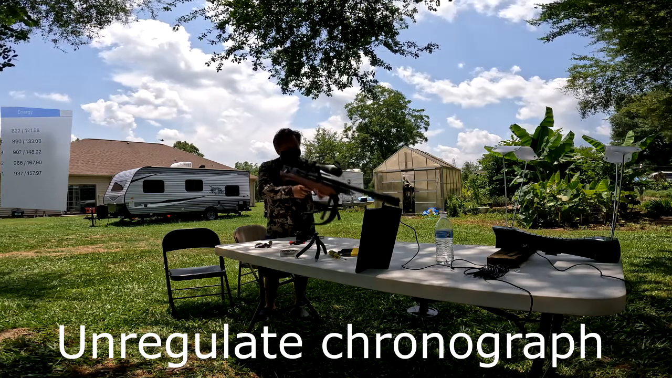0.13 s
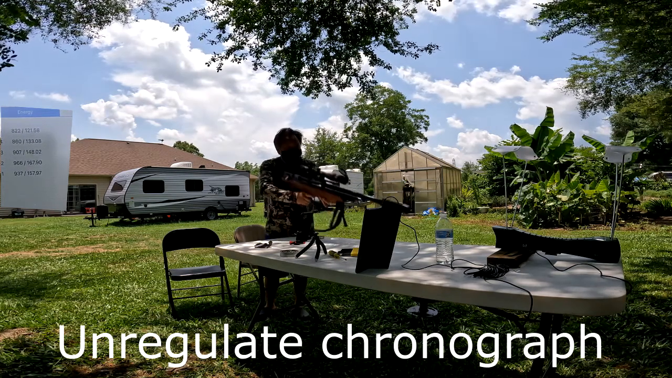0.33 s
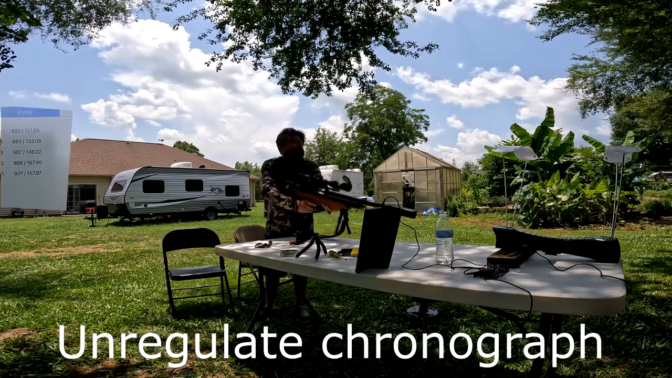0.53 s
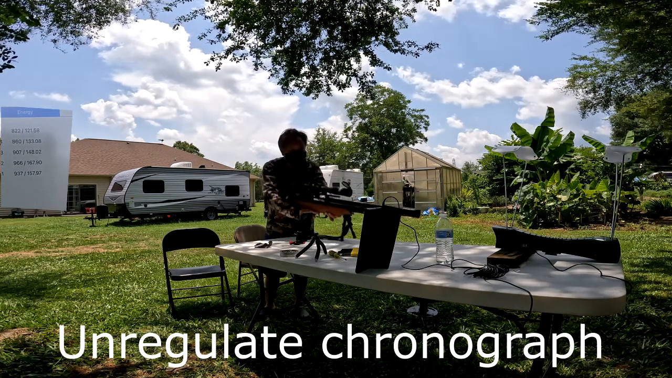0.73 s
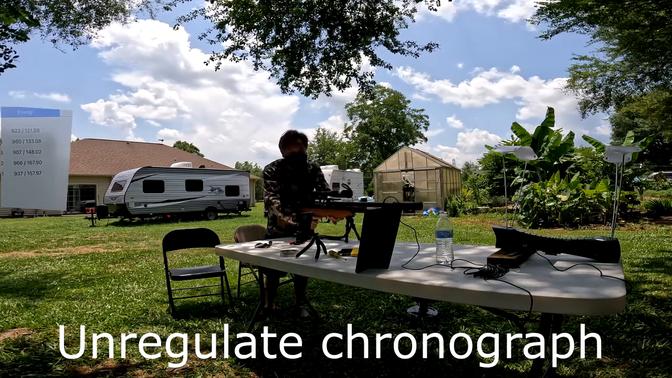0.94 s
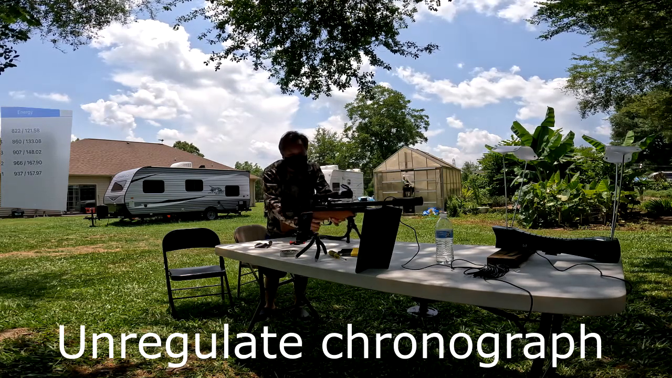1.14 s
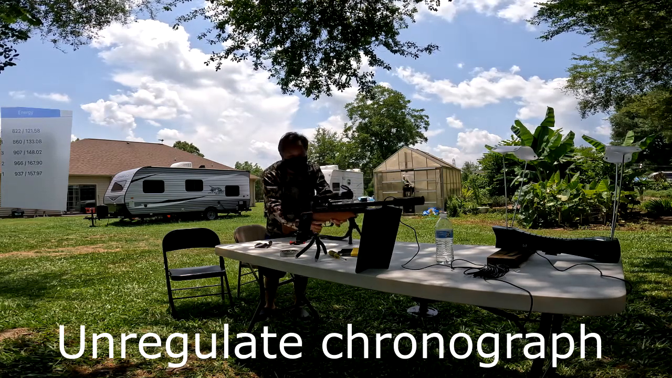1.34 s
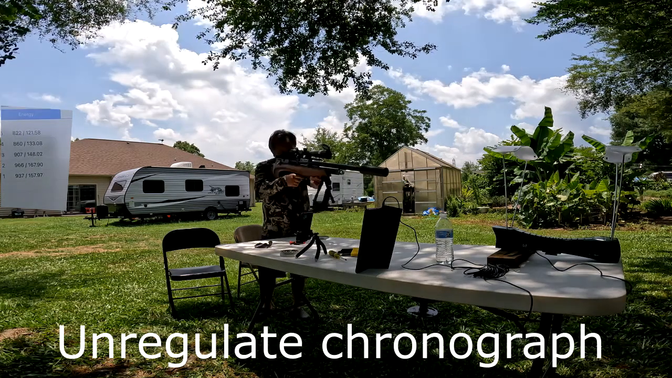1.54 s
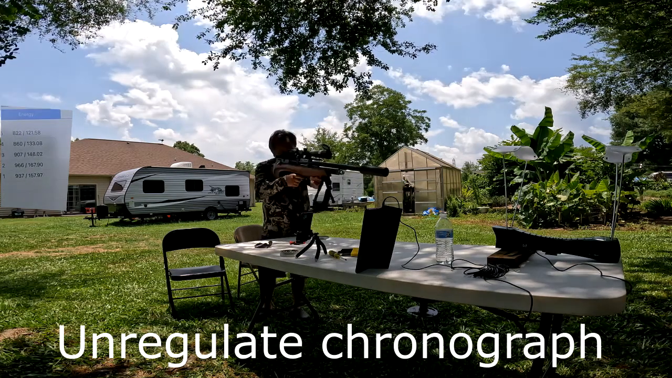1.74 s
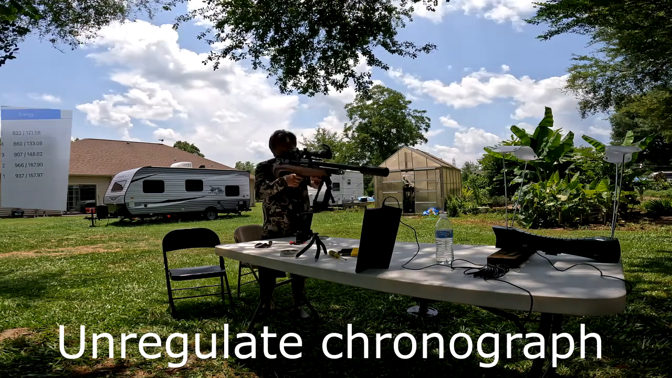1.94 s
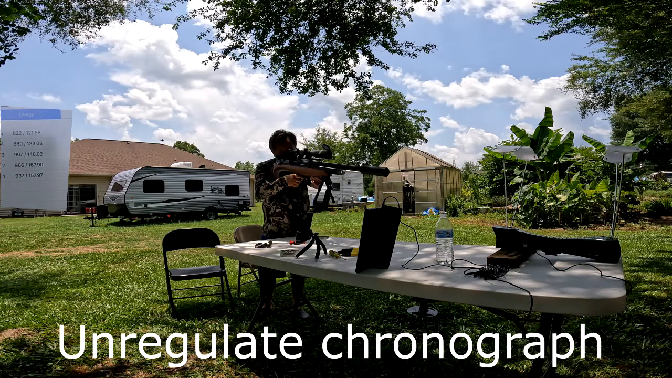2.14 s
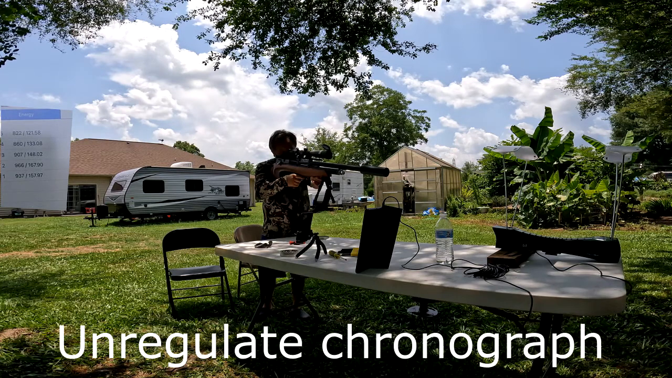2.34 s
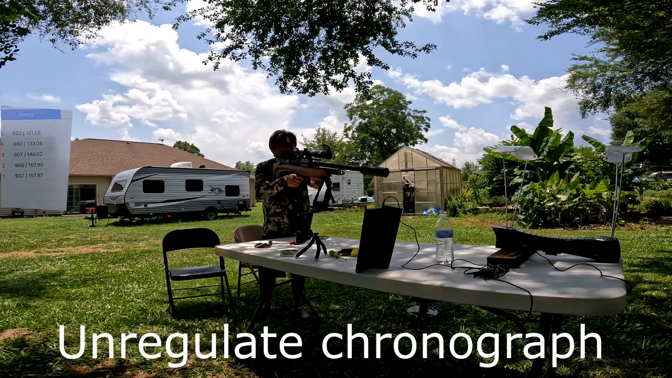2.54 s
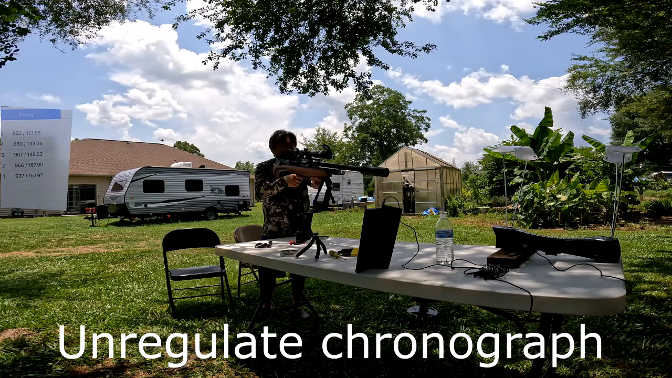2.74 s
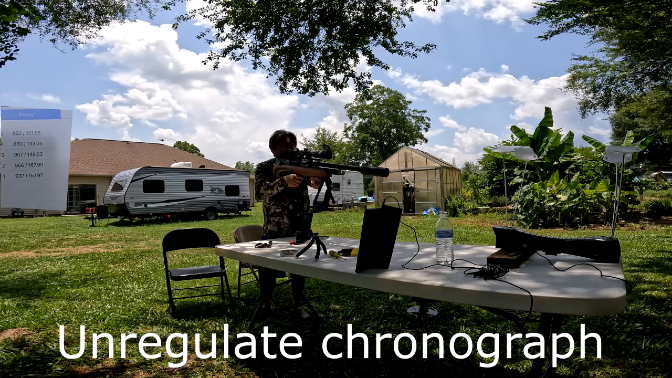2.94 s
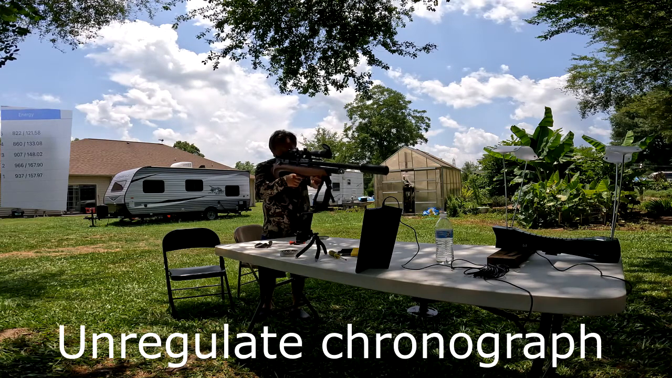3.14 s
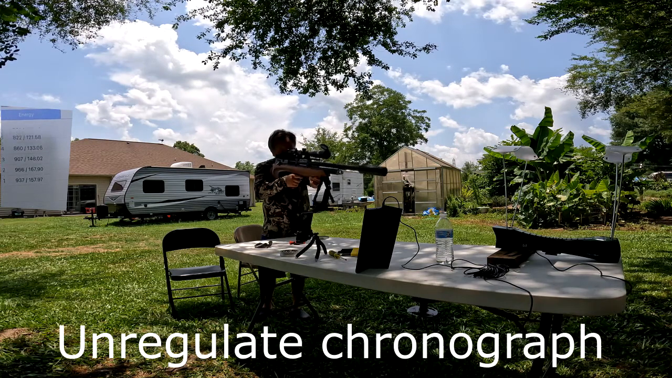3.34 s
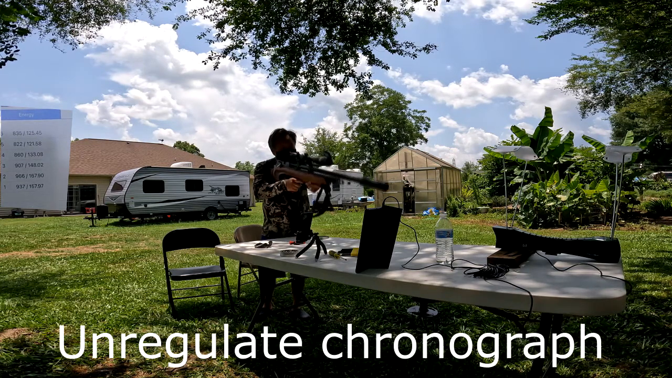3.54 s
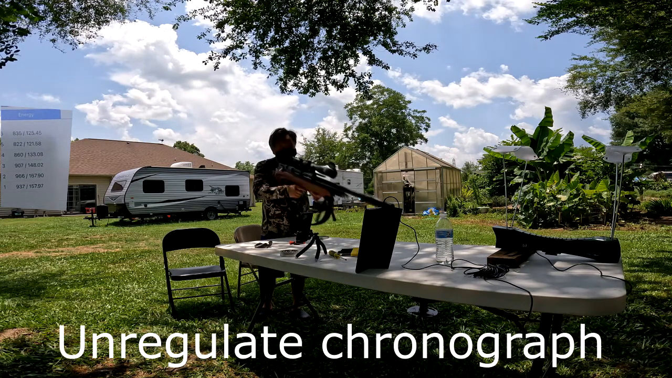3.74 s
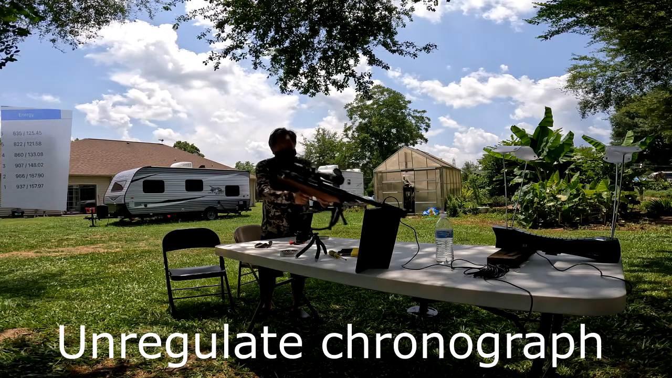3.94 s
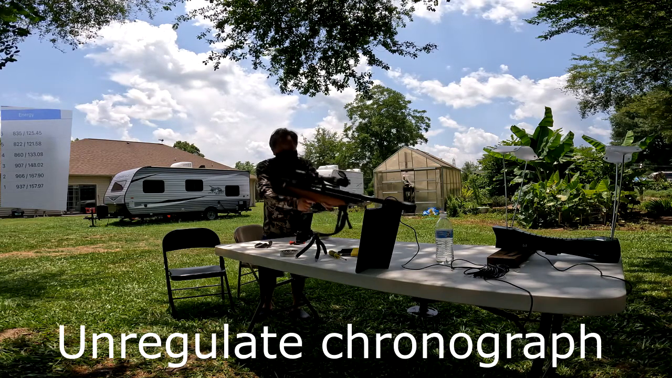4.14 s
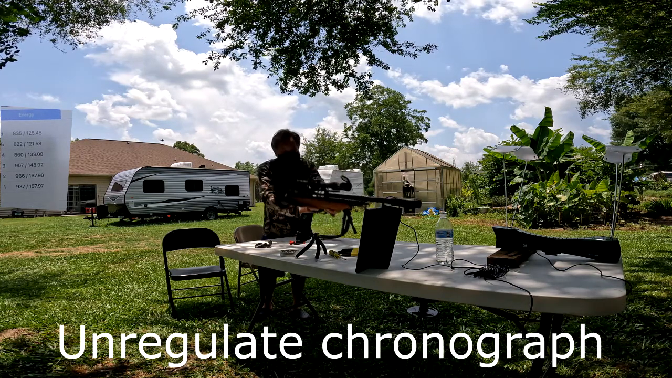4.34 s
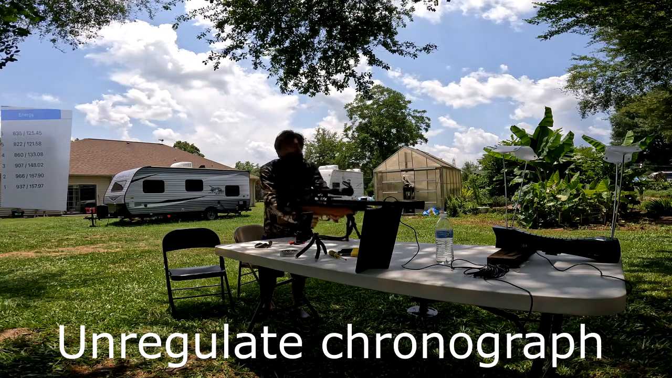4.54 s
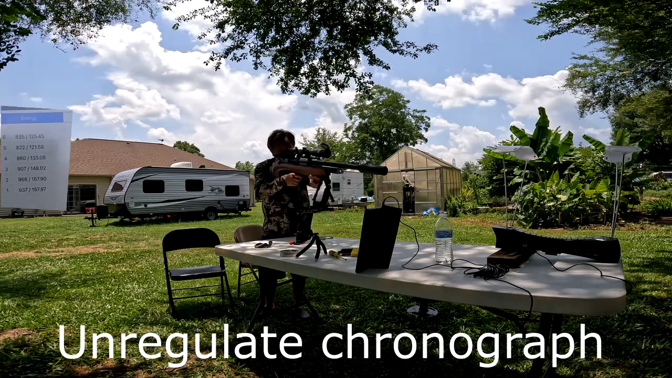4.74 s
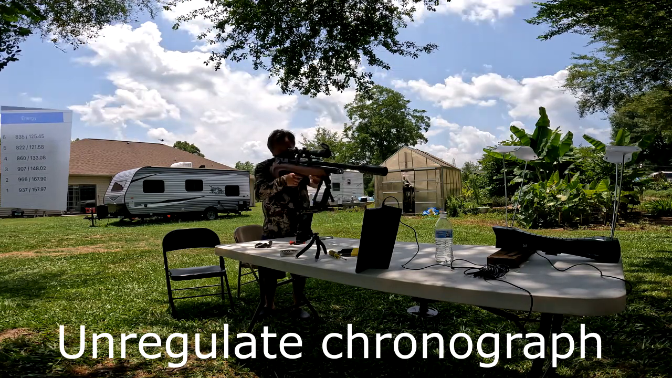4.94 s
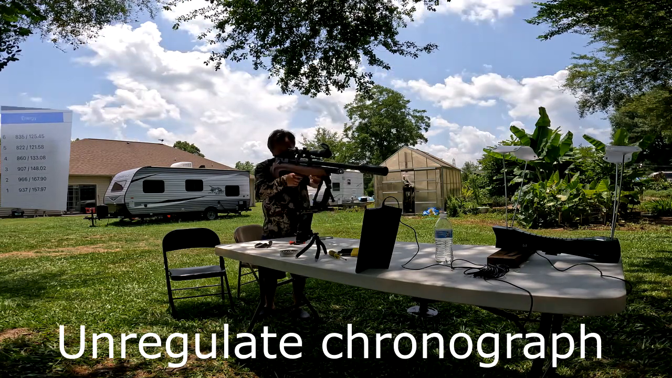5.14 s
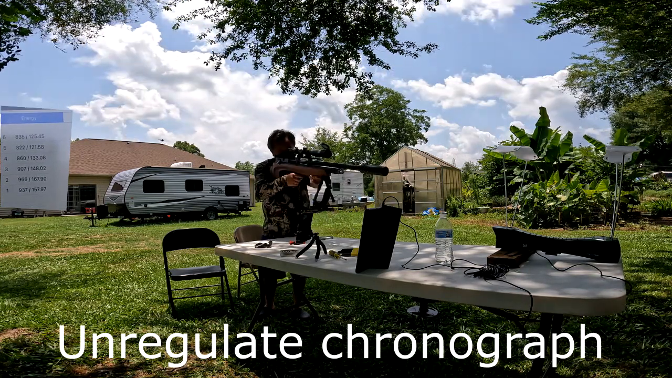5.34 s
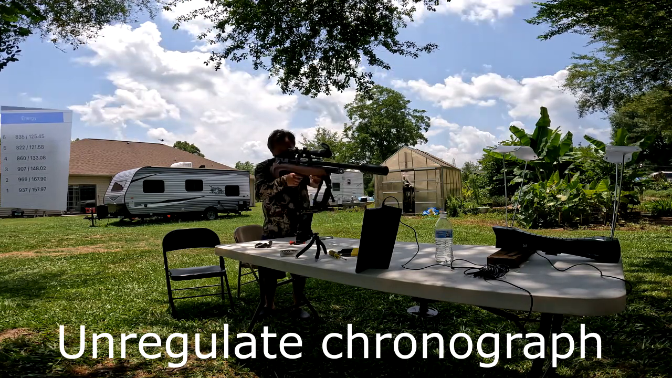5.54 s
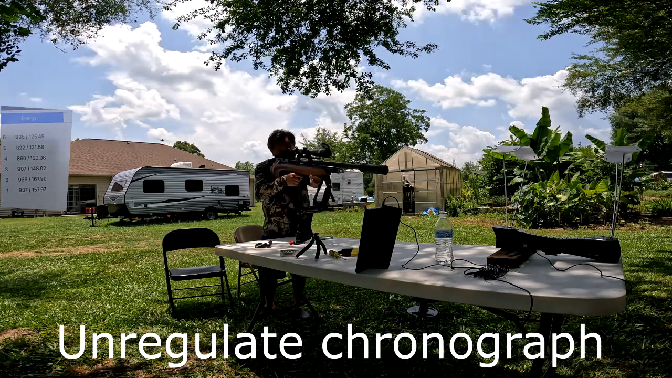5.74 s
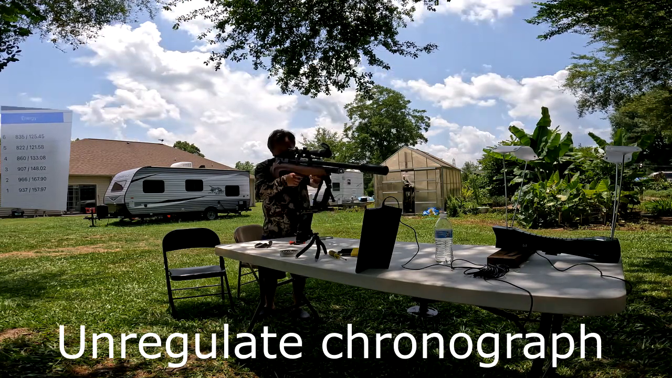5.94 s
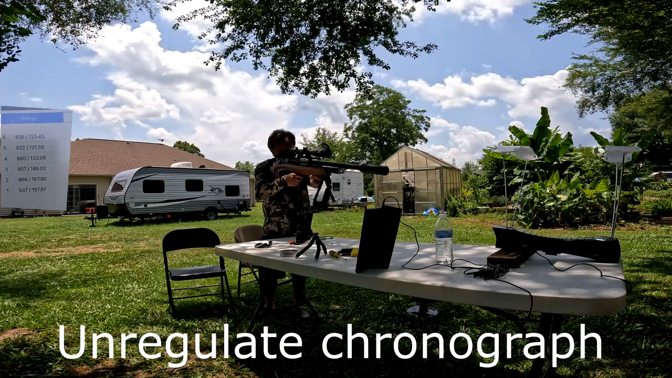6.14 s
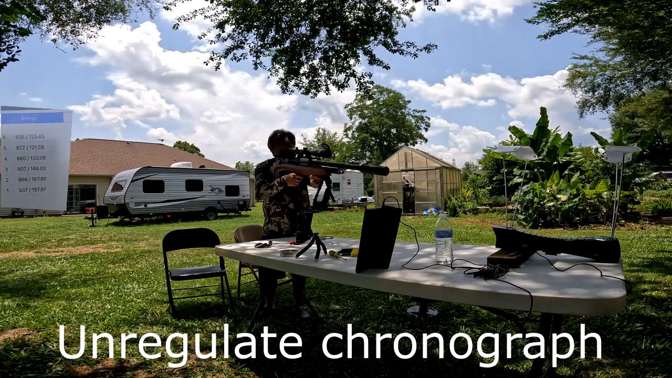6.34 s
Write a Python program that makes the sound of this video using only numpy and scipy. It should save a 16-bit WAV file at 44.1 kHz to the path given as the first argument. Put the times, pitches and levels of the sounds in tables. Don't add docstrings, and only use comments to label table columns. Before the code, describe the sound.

Stereo outdoor sound, close to an air rifle: two metallic lever clacks over engine drone and breeze, a gust bumping the microphone, a momentary dropout, then a low passing vehicle. One hard, bright air crack clips, with a target smack right behind it and a short scattered echo. The background dips and recovers, with faint squeaks and knocks. After a second dropout only generator, leaves, faint insect and birds remain, with a vehicle fading away.

```python
import sys
import numpy as np
from scipy import signal
from scipy.fft import rfft, irfft, next_fast_len
from scipy.io import wavfile
from scipy.ndimage import uniform_filter1d

SR = 44100
rng = np.random.default_rng(int(sys.argv[2]) if len(sys.argv) > 2 else 0)


def attenuation_scalar(level_db):
    decades = np.asarray(level_db, float) / 20
    return 10 ** decades


def master(y):
    cut = np.clip(np.atleast_2d(y).T, -1, 1)
    pcm = np.round(cut * 32767)
    wavfile.write(sys.argv[1], SR, pcm.astype(np.int16))


N = 281799
SHOT_S, EARLIER_S = 3.214, -0.42


def evened(x):
    return x / np.sqrt(np.mean(x ** 2) + 1e-20)


def read(points, hz):
    f, value = np.transpose(points)
    return np.interp(np.log(hz + 1), np.log(f + 1), value)


def curve(rows, outside=None):
    s, *columns = np.transpose(rows)
    t = np.arange(N) / SR
    return [np.interp(t, s, column, outside, outside) for column in columns]


def add(mix, s, sound, lean_db):
    part = mix[:, round(s * SR):][:, :len(sound)]
    part += sound[:part.shape[1]] * attenuation_scalar([[lean_db / 2], [-lean_db / 2]])


def resonate(x, hz, width):
    turn = np.exp(2j * np.pi * np.cumsum(hz * np.ones(len(x))) / SR)
    r = np.exp(-np.pi * width / SR)
    return 2 * (turn * signal.lfilter([1 - r], [1, -r], x / turn)).real


def resonate_twice(x, hz, width):
    return resonate(resonate(x, hz, width), hz, width)


def passband(x, hz, spread):
    f = np.fft.rfftfreq(x.shape[-1], 1 / SR)
    bell = np.exp(-(np.log((f + 1) / hz) / spread) ** 2)
    return irfft(rfft(x) * bell, x.shape[-1])


def wander(per_s):
    steps = rng.standard_normal(500)
    return np.interp(np.arange(N) / SR * per_s, np.arange(len(steps)), steps)


def tone(hz, db, unsteady_db):
    phase = 2 * np.pi * (np.cumsum(hz * np.ones(N)) / SR + rng.random())
    return np.sqrt(2) * attenuation_scalar(db + unsteady_db * wander(per_s=9.)) * np.sin(phase)


def since_shot(t, shot_s):
    return t - np.where(t > shot_s, shot_s, EARLIER_S)


# (frequency [Hz], level [dB per Hz])
YARD = [(20, -7.5), (70, -3.5), (150, -2.5), (300, -16), (400, -22), (560, -19), (800, -25.5), (1300, -22),
        (2000, -30), (4000, -38), (7000, -44), (8500, -53.5), (13000, -59), (14000, -72)]
# (time [s], level [dB])
BREEZE = [(0, 1.5), (.5, -.5), (1.2, 1.5), (2.3, 1), (3.8, 0.5), (6.39, 1)]
# (frequency [Hz], likeness [0-1])
SAME = [(60, 1.0), (180, 1.0), (550, 0.91), (1650, 0.75), (4970, 0.62), (15000, 0.5)]
# (frequency [Hz], left minus right [dB])
LEAN = [(60, 1.5), (180, -0.5), (550, 0), (1650, 3), (4970, 0.5), (15000, 8)]


def yard():
    frames, hz = N // 256 + 5, np.fft.rfftfreq(1024, 1 / SR)
    a, b, c, d, patches = rng.standard_normal((frames, 513, 5)).T
    patches = uniform_filter1d(patches, size=12, axis=0)
    patches = evened(uniform_filter1d(patches, size=10, axis=1))

    s, db = np.transpose(BREEZE)
    middle = np.clip(hz / 600, 0, 1) * np.clip(2000 / (hz + 1), .15, 1)
    breeze_db = np.interp(np.arange(frames) * 256 / SR, s, db) * middle[:, None]

    same = np.clip(read(SAME, hz), -1, 1)[:, None]
    left = a + 1j * b
    right = same * left + np.sqrt(1 - same ** 2) * (c + 1j * d)
    lean_db = read(LEAN, hz)[:, None] / 2 * np.array([1, -1])[:, None, None]
    level_db = read(YARD, hz)[:, None] + lean_db + .9 * patches + breeze_db
    z = np.array([left, right]) * attenuation_scalar(level_db)
    wash = attenuation_scalar(-43.5) * evened(signal.istft(z, nperseg=1024, noverlap=768)[1][:, :N])

    buzz = evened(resonate_twice(rng.standard_normal(N), hz=10600, width=300))
    insect = buzz * attenuation_scalar(-84.5 + 1.5 * wander(per_s=22.0))
    return wash + insect * attenuation_scalar([[1.5], [-1.5]])


# (time [s], level over the calm [dB], half length [s])
GUST = [
    (1.25, 16.5, 0.32),
    (2, 8, 0.3),
    (3.101, 5, 0.24),
    (5, -5, 0.27),
    (6.35, 4.5, 0.29),
]


def wind():
    rumble = resonate_twice(rng.standard_normal(N), hz=30, width=18)
    t = np.arange(N) / SR
    gust_db = sum(db * np.exp(-((t - s) / half) ** 2) for s, db, half in GUST)
    return attenuation_scalar(-49.5 + gust_db) * evened(rumble)


# (time [s], speed [turns per s])
GENERATOR = [(0, 27.33), (1.43, 27), (1.44, 27.6), (2.7, 27.5), (3.4, 27.1), (4.62, 27.65), (4.64, 27.7),
             (6.39, 28.1)]
# (multiple of the speed, level [dB rms])
ORDER_DB = [(1, -44.5), (2, -36.5), (3, -48.5), (4, -44), (5, -45.5), (6, -55), (6.5, -64), (7, -63),
            (8, -55.5), (9, -54.5), (10, -60), (11, -57.5), (16, -71.5), (17, -68)]
# (time [s], exhaust note [Hz], level [dB rms])
EXHAUST = [(1.4285, 73.4, -31.5), (1.75, 73.4, -29), (2.2, 73.3, -31.5), (2.36, 69.3, -38),
           (2.55, 69.3, -33), (2.85, 70.5, -34.5), (3.3, 70.6, -38), (4.1, 70.6, -34.5),
           (4.6315, 70.6, -36)]


def engines():
    speed, = curve(GENERATOR)
    generator = sum(tone(k * speed, db, unsteady_db=1.77) for k, db in ORDER_DB)
    mains = tone(120 + 2. * wander(per_s=4.), -44, unsteady_db=2.5)

    hz, db = curve(EXHAUST, outside=-150)
    exhaust = tone(hz, db, unsteady_db=1.1)
    driveline = (hz > 0) * tone(1.593 * hz, -40, unsteady_db=1.35)

    t = np.arange(N) / SR - 5
    t60 = 7
    leaving = np.clip(t / .06, 0, 1) * tone(74.5, -43.5 - 60 * t.clip(0) / t60, unsteady_db=0.0)
    return generator + mains + exhaust + driveline + leaving


# (start [s], length [s], pitch [Hz], level [dB rms])
SQUEAKS = [(3.861, 0.092, 4900, -71), (3.947, .14, 5000, -71.5), (3.95, .09, 5820, -73),
           (3.84, .09, 5730, -74), (3.96, .1, 3300, -69), (4.242, 0.16, 5180, -70), (4.361, .13, 5010, -71),
           (4.47, .17, 4950, -68.5), (4.573, 0.064, 5790, -76)]
SQUEAK_SAG_HZ_PER_S = 254
# (start [s], length [s], start pitch [Hz], end pitch [Hz], level [dB rms])
CHIRPS = [(0.09, 0.15, 1550, 1230, -57.5), (.095, 0.058, 2960, 3100, -59.5), (4.24, .13, 1600, 1290, -61),
          (4.56, .1, 1420, 1350, -63), (1.18, .1, 3000, 3050, -67), (2.005, 0.069, 5600, 4350, -66.5),
          (5.1, 0.057, 4150, 4000, -67), (5.2, .07, 4900, 5200, -73)]


def whistles():
    out = np.zeros((2, N))
    notes = [(s, length, hz, hz - SQUEAK_SAG_HZ_PER_S * length, db, 0) for s, length, hz, db in SQUEAKS]
    for row in CHIRPS:
        glide_hz = abs(row[3] - row[2])
        notes.append((*row, 120 + .14 * glide_hz))
    for s, length, start_hz, end_hz, db, width in notes:
        n = round(length * SR)
        hz = np.geomspace(start_hz, end_hz, n)
        hiss = rng.standard_normal(16000)[:n]
        sound = evened(resonate_twice(hiss, hz, width + 60))
        if width < 20:
            sound = 1.02 * np.sin(2 * np.pi * np.cumsum(hz) / SR) + .55 * sound
        add(out, s, attenuation_scalar(db) * evened(sound) * signal.windows.tukey(n, .35), 1.5)
    return out


def blows(rows, loose, rise):
    out = np.zeros((2, N))
    t = np.arange(6000) / SR
    for s, db, hz, t60, lean_db in rows:
        noise = evened(passband(rng.standard_normal((3, len(t))), hz, spread=.33))
        rattle = .9 * (1 - np.exp(-(t60 / 0.01) ** 2))
        onset = (1 - np.exp(-t / (rise * t60))) ** 2
        shape = attenuation_scalar(db - 60 * t / t60) * onset
        ring = (1 - rattle) * np.sin(2 * np.pi * hz * t)
        add(out, s, shape * (ring + 0.65 * rattle * noise[0]), lean_db)
        part = out[:, round(s * SR):][:, :len(t)]
        part += loose * shape * noise[1:]
    return out


def strike(s, db, lean_db, modes):
    return [(s + ms / 1000, db + mode_db, hz, t60, lean_db) for hz, mode_db, t60, ms in modes]


# (pitch [Hz], peak [dB], time to fade 60 dB [s], delay [ms])
TARGET = [(2800, -24.5, .055, 0), (4200, -31, 0.058, 0.56), (5600, -32, 0.054, .5)]
# (time [s], level [dB], left minus right [dB])
SMACKS = [
    (3.365, 2.5, 3.3),
    (3.374, -1, 5),
]
# (time [s], peak [dB], pitch [Hz], time to fade 60 dB [s])
SLAPS = [
    (3.428, -32, 1400, 0.049),
    (3.446, -31.5, 2770, .05),
    (3.475, -35, 2388, .07),
]


def pellet():
    rows = [blow for row in SMACKS for blow in strike(*row, TARGET)]
    rows += [(*row, 0) for row in SLAPS]
    return blows(rows, loose=0.26, rise=0.015)


# (delay [s], level [dB rms], spread [s], time to fade 60 dB [s])
ECHO = [
    (.002, -23, .004, 0.15),
    (.018, -31.5, 0.015, .2),
    (.06, -42, .19, 0.27),
    (.15, -50, 0.11, 1.37),
]
# (frequency [Hz], level [dB per Hz])
ECHO_COLOUR = [(200, -13.5), (600, -7.5), (1300, -1), (2500, -1.5), (4500, -1.5), (7000, -2), (8500, -11),
               (10500, -10), (13000, -14.5), (15500, -29.5)]


def echoes():
    front, across = rng.standard_normal((2, N)) * np.sqrt(rng.exponential(1, (2, N)))
    pair = np.array([front + 0.55 * across, front - .45 * across])
    hz, frame_s, z = signal.stft(pair, SR, nperseg=128)
    delay = np.clip(since_shot(frame_s, SHOT_S), 0, 1)
    air_db = -4.5 * delay * (hz[:, None] / 1000 - 4)
    colour = evened(attenuation_scalar(read(ECHO_COLOUR, hz))[:, None])
    tail = signal.istft(z * colour * attenuation_scalar(air_db), SR, nperseg=128)[1][:, :N] / np.std(front)

    t = since_shot(np.arange(N) / SR, SHOT_S)
    power = 0
    for s, db, spread, t60 in ECHO:
        rise = np.clip((t - s) / (.3 * s) + 1, 0, 1)
        fade = attenuation_scalar(db - 60 * (t - s - spread).clip(0) / t60)
        power = power + (rise * fade) ** 2
    return tail * np.sqrt(power) * attenuation_scalar(1.5 * wander(per_s=170.0))


# (time [s], peak [dB], half width [s], left minus right [dB])
PUSHES = [(3.2159, -8, 0.00076, -5), (3.2201, -10, .0016, -4), (3.2276, -16, .0012, 0),
          (3.231, -21, 0.00097, -3), (3.2367, -20, .0014, 0.5), (3.2441, -15, 0.0012, -1),
          (3.2493, -24.5, .0015, -1.5), (3.257, -22, .0025, -0.5)]
# (time [s], level [dB rms])
TANK = [(3.225, -46), (3.3, -47), (3.45, -44), (3.5, -51.5), (3.58, -62), (3.65, -60), (3.8, -72)]


def air():
    out = np.zeros((2, N))
    for s, db, half, lean_db in PUSHES:
        u = (np.arange(800) - 400) / SR / half
        push = (1 - 0.49 * u ** 2) * np.exp(-u ** 2 / 2)
        add(out, s - 400 / SR, attenuation_scalar(db) * push, lean_db)
    t = np.arange(8000) / SR
    swing = -attenuation_scalar(-13 - 60 * t / .1) * np.sin(2 * np.pi * 38 * t)
    add(out, 3.2213, swing, 0)
    return out + tone(472, curve(TANK, outside=-150)[0], unsteady_db=-1.0)


# (pitch [Hz], peak [dB], time to fade 60 dB [s], delay [ms])
HAMMER = [(1400, -24, 0.024, -3), (2950, -16, 0.02, -0.5), (6950, -18, 0.015, 0.3), (10500, -20.5, .01, 0),
          (5000, -19, .016, 2.5)]
VALVE = [(7103, 1.5, 0.0041, 0.025), (1500, -15, 0.0086, 0), (4500, -14, 0.018, .1),
         (7500, -20, 0.014, 1.2)]
MUZZLE = [(1430, 3, .003, 0.5), (700, -14.5, .008, 0), (6000, -1.5, .011, .4), (10020, -10.5, .007, 1),
          (12000, -20, 0.0079, 1), (3500, -9, .013, 1), (2200, -19, 0.014, 1.5)]
LEVER_OUT = [(676, -36.5, 0.053, 1.2), (1370, -36, .06, 1.95), (1950, -32, 0.034, 0.15),
             (2920, -36.5, .03, 1), (3500, -34.5, 0.018, 0.13), (5500, -43, 0.013, 0.19)]
LEVER_HOME = [(606, -37.5, 0.073, 0.42), (1100, -37, 0.051, 1.26), (1750, -29, 0.038, 1.88),
              (3280, -35, 0.028, 0.36), (4770, -38, .025, 0.17), (6350, -40, 0.009, 0.15)]
# (time [s], level [dB], left minus right [dB])
FIRING = [
    (3.2055, 5.5, 0),
    (3.2113, 5.499, -2.5),
    (3.2141, 5, -2.5),
]
# (time [s], level [dB], left minus right [dB])
COCKING = [
    (.77, 2.9, -.5),
    (1.0295, 3.9, -1),
]
# (time [s], peak [dB], pitch [Hz], time to fade 60 dB [s])
TRIGGER = [(3.161, -48, 5000, 0.021), (3.1745, -43.5, 6500, .015), (3.191, -37.5, 3500, .03),
           (3.193, -40, 9000, .03), (3.2, -29, 7500, .012), (3.202, -25, 2500, 0.033)]
# (time [s], peak [dB], pitch [Hz], time to fade 60 dB [s])
HANDS = [(0.069, -42, 1340, 0.28), (.1, -43.5, 2590, 0.23), (.756, -39, 2000, 0.024),
         (1.187, -47, 6000, 0.014), (1.21, -51, 5000, .02), (1.295, -55, 3500, .03), (1.31, -39, 990, 0.09),
         (3.698, -37, 400, 0.038), (3.74, -45, 1400, 0.11), (3.749, -45.5, 2700, 0.063),
         (4.3, -46, 1300, .13), (4.3, -39.5, 700, .1), (4.41, -48.5, 2770, .03)]
TICKS_LEAN_DB = -1


def rifle():
    firing = [(*row, TICKS_LEAN_DB) for row in TRIGGER]
    for row, modes in zip(FIRING, (HAMMER, VALVE, MUZZLE)):
        firing += strike(*row, modes)
    handling = strike(*COCKING[0], LEVER_OUT) + strike(*COCKING[1], LEVER_HOME)
    handling += [(*row, TICKS_LEAN_DB) for row in HANDS]
    x = blows(firing, loose=0.11, rise=0.044) + air() + blows(handling, loose=0.17, rise=0.024)

    n, left_lag_s = next_fast_len(N), .000016
    half_turn = np.pi * np.fft.rfftfreq(n, 1 / SR) * left_lag_s
    turn = np.exp(-1j * half_turn * np.array([[1], [-1]]))
    return irfft(rfft(x, n) * turn, n)[:, :N]


def scene():
    return yard() + wind() + engines() + whistles() + pellet() + echoes() + rifle()


def roll_off(x):
    return signal.sosfilt(signal.butter(12, 16500, fs=SR, output="sos"), x)


# (time [s], fade [s])
CUTS = [
    (1.4285, 0.0052),
    (4.6315, 0.0062),
    (6.39, 0.0039),
]


def record(dry):
    taps = signal.firwin(65, 15000, window=("kaiser", 7), fs=SR)
    x = signal.oaconvolve(dry, taps[None], "same")

    t = np.arange(N) / SR
    since = since_shot(t, SHOT_S + .008)
    duck_db, duck_s, hold_s, recover_db_per_s = 6.5, 0.068, 0.52, 7.5
    recovering_db = np.clip(duck_db - recover_db_per_s * (since - hold_s).clip(0), 0, None)
    x = x * attenuation_scalar(-np.clip(since / duck_s, 0, 1) * recovering_db)
    x = np.clip(x, -1, 1)
    for s, fade in CUTS:
        x = x * np.clip(abs(t - s) / fade, 0, 1)
    return roll_off(x)


dry = scene()
out = record(dry)
master(out)
```